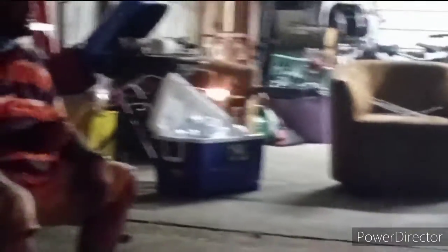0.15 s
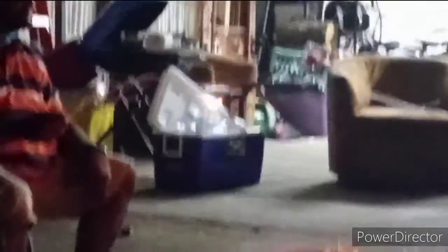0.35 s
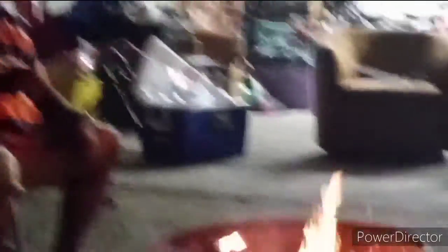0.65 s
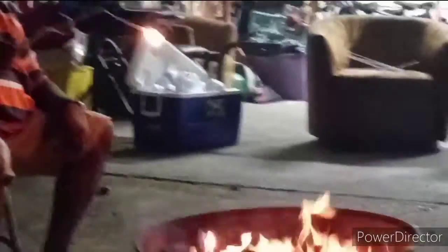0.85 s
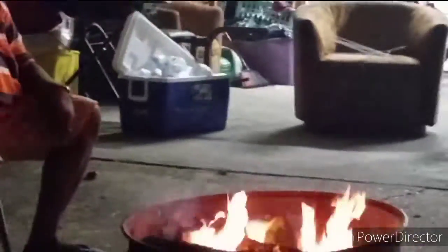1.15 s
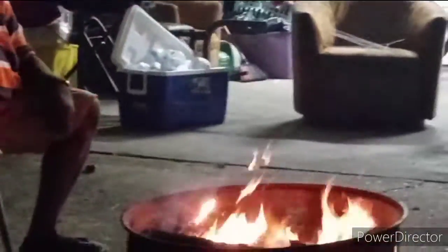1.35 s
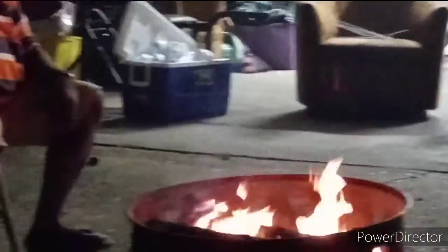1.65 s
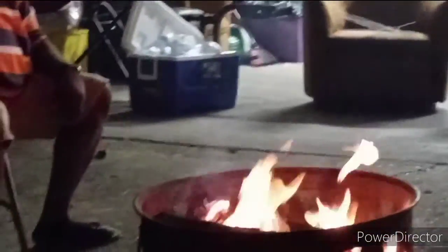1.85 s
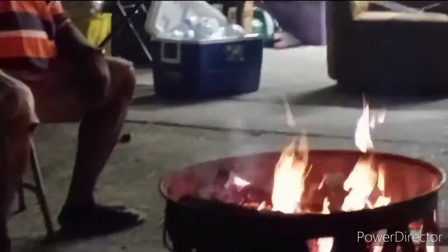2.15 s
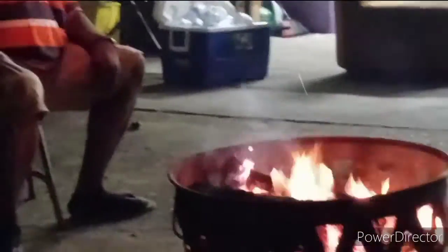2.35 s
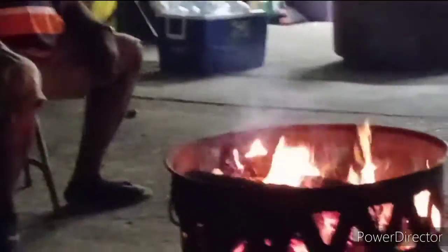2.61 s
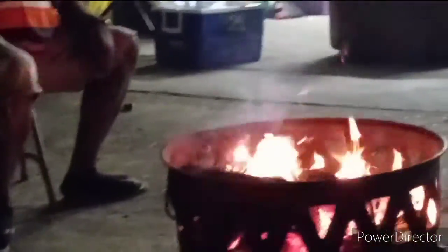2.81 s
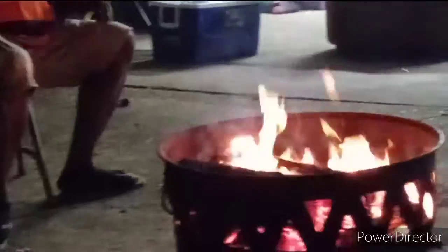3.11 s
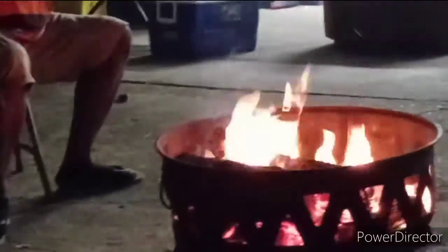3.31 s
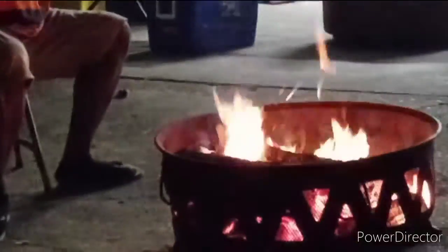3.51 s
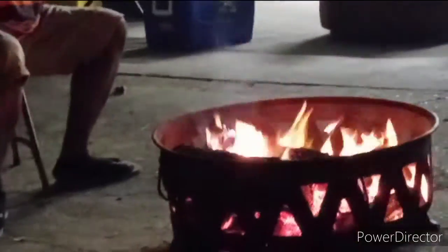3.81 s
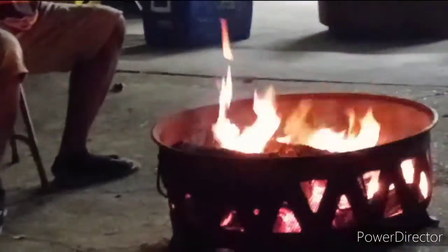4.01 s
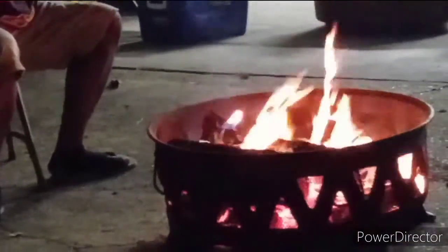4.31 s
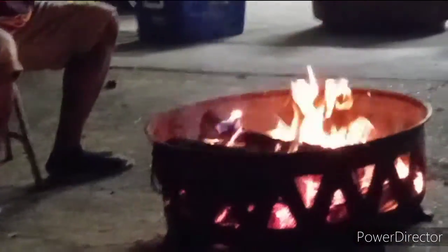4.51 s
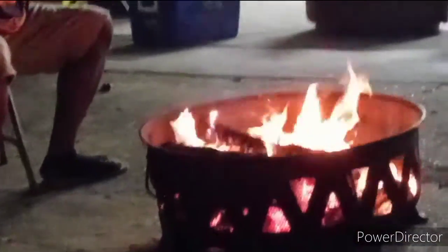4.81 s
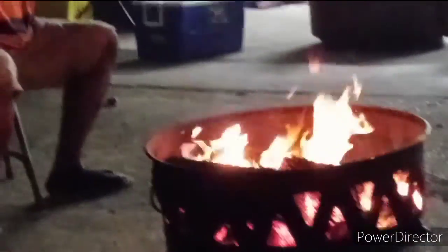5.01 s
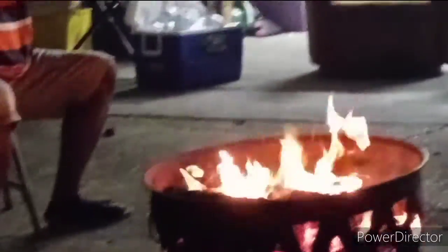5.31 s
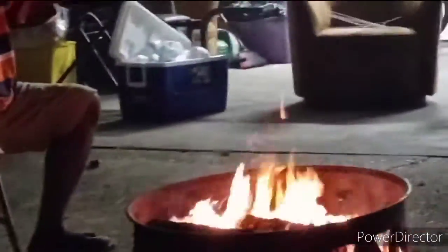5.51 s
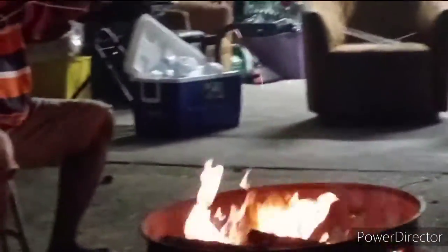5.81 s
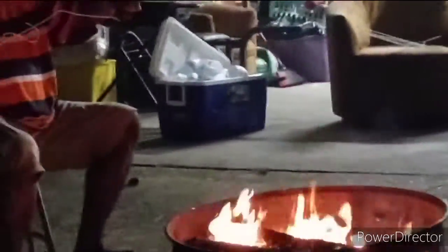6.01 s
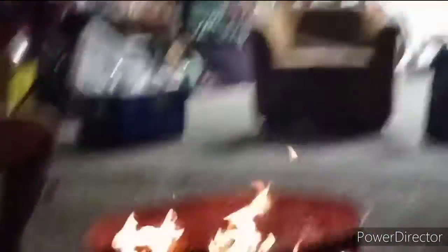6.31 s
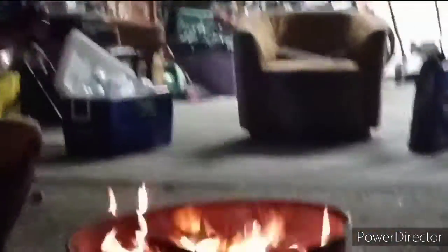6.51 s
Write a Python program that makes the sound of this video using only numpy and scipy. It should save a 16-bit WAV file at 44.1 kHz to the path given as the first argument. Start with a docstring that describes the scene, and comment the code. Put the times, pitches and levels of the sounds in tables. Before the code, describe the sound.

Night outdoors beside a small wood fire and open garage, heard in mono through one microphone. For about 6.7 seconds a dense cricket chorus holds: a bright trill near 7 kHz, pulsing chirps near 5.6 kHz, and fainter trills at 2.5 and 3 kHz. Closer chirps stand out at 0.15, 3.6 and 5.2. Far katydids make two-syllable rasps roughly every 0.8 seconds; a nearer one rasps in quick strokes at 2.2, 3.5, 4.5 and 6.4, with fluttering bush cricket buzzes around 2.2, 3.4, 4.5, 5.5 and 6.4. Dry fire pops snap at 0.24 and 0.55, then near 3, strongest with woody ring at 4.4, and again at 5.75, with tiny ticks between. Gritty scuffs come around 0.3, 1.15, 2.5, 4.8 and 5.9; soft knocks at 0.6, 2.0, 2.4 and 5.9. Faint fading rustle, traffic rumble and low engine drones lie beneath, the deepest from 5.8.

```python
"""First you hear a night full of crickets: crowds trilling at four pitches, and a few chirping closer. Katydids
rasp in short phrases and calls, and a high buzz of shaped noise comes in rhythmic bursts. A wood fire pops and
ticks: short bright noise with ringing wood. Filtered noise scuffs and knocks softly by an open garage. A faint
rustle, far insects and traffic, with wavering engine tones, lie underneath."""
import sys
import numpy as np
from scipy import signal
from scipy.fft import rfft, irfft, next_fast_len
from scipy.io import wavfile

SR = 44100
rng = np.random.default_rng(int(sys.argv[2]) if len(sys.argv) > 2 else 0)


def waveform_to_disk(signal):
    """Save audio, clipped to [-1, 1], as 16-bit WAV at the path in sys.argv[1]."""
    frames = np.transpose(np.atleast_2d(signal))
    scaled = np.clip(frames, -1, 1) * 32767
    samples = np.round(scaled).astype(np.int16)
    wavfile.write(sys.argv[1], SR, samples)


N = 293328
TIME = np.arange(N) / SR  # seconds

# two lower cricket crowds: (wing tone [Hz], spread between animals [Hz], mean stroke rate [1/s], level [dB])
TREE_CRICKETS = [(2459, 68, 48, -54), (2969, 70, 70, -58.5)]
# two higher crowds, same columns; the level is the average [dB] for the trill, the steady part for the chirpers
HIGH_CRICKETS = (6915, 150, 42.5, -43.3)
CHIRPERS = (5600, 165, 53, -50.5)
# drift of the high trill, used only as the difference from its mean: (time [s], level [dB])
HIGH_DRIFT = [(0, -45.5), (1.8, -46), (2.45, -44), (3.9, -45), (4.7, -44), (5.4, -45.5), (6.0, -49),
              (6.33, -46.5), (6.65, -46)]
# bouts of the chirping crowd: (start [s], length [s], level relative to its steady trill [dB])
BOUTS = [(0.053, 0.35, 4.5), (0.696, 0.28, 6), (1.326, 0.42, 3.5), (1.99, .31, 6.5), (2.597, 0.5, 6),
         (3.32, 0.7, 3.5), (4.42, .17, 2.5), (4.862, 0.18, 3.5), (5.17, 0.28, 6), (6.243, 0.16, 3)]
BOUT_ATTACK_S, BOUT_RELEASE_S = 0.086, 0.14
# chirps of nearer crickets: (start [s], wing strokes [count], wing tone [Hz], level before echo [dB])
CHIRPS = [(.15, 9, 5760, -45), (.68, 11, 5630, -49), (.78, 10, 5880, -50), (1.28, 10, 5570, -50),
          (1.98, 11, 5460, -51), (2.899, 12, 5840, -48.5), (3.604, 13, 5545, -42.5), (3.87, 11, 5380, -57),
          (5.161, 11, 5590, -42)]

# phrases of a near katydid:
# (middle of first stroke [s], strokes [count], stroke period [s], level [dB], change per stroke [dB])
PHRASES = [(2.199, 5, .0598, -39.3, 0.44), (3.49, 4, 0.06, -43, .7), (4.456, 6, .0628, -41.5, -1.45),
           (6.385, 5, 0.054, -47, 0.5)]
# tone colour of a katydid's toothed file: (frequency [Hz], relative level [dB])
RASP_COLOUR = [(3500, -21.5), (6000, -4), (7500, 3), (9500, 2.5), (10500, 1), (11500, -7), (15000, -10)]
STROKE_S, TOOTH_HZ = 0.019, 623  # half-width of a stroke; average teeth struck per second
# two-syllable calls of a far katydid: (start [s], level [dB])
FAR_CALLS = [(0.005, -49.5), (.785, -49.5), (1.535, -49), (2.03, -56.5), (2.26, -54), (3.26, -51.5),
             (4.06, -53), (4.915, -51), (5.745, -48.5), (6.515, -48)]
# tone colour of far katydids: (frequency [Hz], relative level [dB])
FAR_COLOUR = [(1750, -22.5), (2100, -3.5), (2350, 1), (3000, 3), (3500, 1), (4200, -7), (5000, 2),
              (8000, -17.5), (14000, -15)]
SYLLABLE_S, SYLLABLE_STEP_S, SYLLABLE_ATTACK_S, SYLLABLE_RELEASE_S = 0.027, 0.12, 0.035, 0.067
FAR_STEADY_DB = -64  # middle level of the rasp from still farther animals
# high buzzes: (start [s], length [s], level before flutter [dB])
BUZZES = [(2.18, 0.31, -52.5), (3.432, 0.25, -51), (4.467, 0.32, -51.5), (5.482, 0.36, -50.5),
          (6.424, 0.21, -50.5)]
# tone colour of the buzz: (frequency [Hz], relative level [dB])
BUZZ_COLOUR = [(5000, -31), (7500, 9.5), (8800, 8.5), (10500, 2), (12000, -2), (15000, -10)]
BUZZ_ATTACK_S, BUZZ_RELEASE_S, BUZZ_STEADY_DB = 0.087, 0.15, -66.5

# fire pops; both levels are before halving and fading:
# (start [s], crack level [dB], woody ring level [dB], lowest ring [Hz], time to fall 60 dB [s])
POPS = [(.08, -34, -50, 2600, 0.013), (0.239, -24, -31.5, 2600, 0.0058), (0.547, -24, -44, 2600, .007),
        (.620, -33, -40, 2000, .008), (2.948, -30, -48, 2600, 0.009), (3.13, -33, -50, 2600, 0.0077),
        (3.4233, -39, -31, 2730, 0.015), (3.797, -50, -40, 1950, .022), (4.3926, -19.5, -22.5, 1660, 0.01),
        (4.4106, -34, -33, 2330, 0.013), (4.754, -37, -31.5, 2300, .022), (5.739, -27, -48, 2600, .006),
        (5.9055, -38, -45, 2600, .006)]
# tone colour of the bright crack: (frequency [Hz], relative level [dB])
CRACK_COLOUR = [(2000, -76), (4500, 9), (7000, 3), (11000, 14.5), (15000, 7)]
# ringing tones of a splitting log: (multiple of the lowest ring [ratio], relative level [dB])
WOOD_RINGS = [(1, -4), (1.52, 3.5), (1.78, 8), (2.1, -10), (2.55, -13)]

# scuffs; levels are before the pressure, resonances and echo shape them:
# (peak [s], rub level [dB], dying time [s], lower resonance [Hz], upper resonance [Hz], dry hiss level [dB])
SCUFFS = [(.166, -52.5, 0.048, 900, 1950, -46), (.328, -48.5, 0.026, 865, 1150, -46.5),
          (.368, -49, 0.071, 830, 1600, -42.5), (1.135, -53, .022, 1190, 1720, -42),
          (1.168, -50, 0.061, 780, 1600, -64), (2.049, -58.5, .06, 1700, 1950, -70),
          (2.41, -56, .07, 810, 1250, -70), (2.51, -45, 0.039, 1510, 2080, -72),
          (2.557, -47, 0.056, 1150, 1420, -58), (2.835, -57.5, 0.063, 710, 1270, -75),
          (3.065, -51.5, 0.075, 840, 1830, -65), (4.775, -50.5, 0.042, 1600, 1950, -66),
          (4.86, -55, .08, 1930, 2080, -70), (5.15, -54, .11, 1710, 1980, -58),
          (5.29, -55.5, .04, 1660, 1900, -69), (5.77, -57, 0.093, 1510, 2070, -63),
          (5.872, -47.5, 0.026, 1490, 1950, -58), (5.908, -48.5, .028, 660, 1060, -65)]
# tone colour of the dry hiss: (frequency [Hz], relative level [dB])
SCUFF_HISS_COLOUR = [(2000, -8), (4000, 6), (9000, -0.5), (13000, 6), (15500, 1)]
# widths of the resonances: (lower [Hz], upper [Hz])
SCUFF_WIDTHS_HZ = 92, 190
SCUFF_RISE_SHARE = .42  # rise time as a share of the dying time
SCUFF_DIRECT_SHARE = 0.55  # of the rub, heard beside the resonances
GRIT_HZ, GRIT_DB = 260.5, 0.5  # how fast and how deeply a rub catches
# soft knocks; levels are before fading and echo: (start [s], dull thud [dB], woody clack [dB])
KNOCKS = [(0.621, -44.5, -52), (2.001, -44.5, -59), (2.385, -41, -41.5), (3.588, -59, -49),
          (3.802, -66, -58), (5.89, -42, -54.5)]
# tone colour of the dull thud: (frequency [Hz], relative level [dB])
THUD_COLOUR = [(100, -8), (250, 14), (480, -1.5), (800, -19), (2000, -43)]
# tone colour of the woody clack: (frequency [Hz], relative level [dB])
CLACK_COLOUR = [(400, -16), (800, -7.5), (1350, 1.5), (2000, -2), (3500, -1), (7000, -23)]

# starting level, fade per second, and greatest swing of each band either way
RUSTLE_DB, RUSTLE_FADE_DB_PER_S, RUSTLE_FLICKER_DB = -67.5, 0.92, 7.5
# tone colour of distant traffic: (frequency [Hz], relative level per Hz [dB])
TRAFFIC_COLOUR = [(20, -22), (35, -20), (55, -6.5), (85, 4), (130, 4), (200, -1.5), (300, -5.5), (400, -20),
                  (550, -34.5), (1050, -34), (1500, -27.5), (2000, -29.5), (3000, -21.5), (6000, -77)]
# tone colour of the haze of far insects: (frequency [Hz], relative level per Hz [dB])
HAZE_COLOUR = [(2000, -49), (3200, -31), (4100, -23), (4600, -10), (5100, -0.5), (6200, -1.5), (7400, 1),
               (8200, -19), (9100, -7), (10000, -19), (11000, -24), (15000, -20)]
TRAFFIC_DB, HAZE_DB = -50.5, -47  # middle levels; both waver
# drones of distant engines: (start [s], length [s], firing rate [Hz], climb [Hz], middle level [dB])
DRONES = [(0.187, 0.14, 180, 1.9, -52.5), (.65, 1.11, 120.1, 6.7, -49.5), (3.254, 0.46, 201, 13, -56.5),
          (4.3, 0.87, 117.4, 8.1, -50.5), (5.763, 0.99, 75.3, .7, -46)]
DRONE_ATTACK_S, DRONE_RELEASE_S = 0.067, 0.092
DRONE_WAVER_DB, DRONE_WAVER_SHARE = 2.0, .01  # of the level; of the firing rate
TOP_HZ = 15550  # where the recorder starts to cut the treble


def crickets():
    """Tree crickets hold steady, the high trill drifts in level, and the chirping crowd joins in by bouts."""
    low = sum(crowd(*row) for row in TREE_CRICKETS)
    drift_s, drift_db = np.transpose(HIGH_DRIFT)
    drift = np.interp(TIME, drift_s, drift_db)
    high = crowd(*HIGH_CRICKETS) * undb(drift - drift.mean())
    bouts = [undb(db) * swell(start, length, BOUT_ATTACK_S, BOUT_RELEASE_S)
             for start, length, db in BOUTS]
    chirping = crowd(*CHIRPERS) * together([1] + bouts)
    return low + high + chirping


def crowd(hz, spread_hz, rate, db, count=14):
    """Many crickets, each with its own pitch and tempo; their pitches stray, and distance blurs them."""
    out = np.zeros(N)
    for rank in (np.arange(count) + .5) / count:
        # most animals sit near the middle pitch, a few far off it
        place = .45 * np.log(rank / (1 - rank))
        own_hz = hz + spread_hz * (place + .6 * walk(25))
        first_stroke = rng.random()
        tempo = rate * (1 + .17 * rng.standard_normal() + .05 * walk(5))
        strokes = first_stroke + np.cumsum(tempo) / SR
        out += wing_tone(strokes, own_hz, sag=.04, duty=.6)
    return undb(db) * unit(yard(out, t60=0.46, wet_db=-9.0))


def wing_tone(strokes, hz, sag, duty):
    """A cricket's wing rings while it closes; the pitch sags through each stroke."""
    closing = np.minimum(strokes % 1 / duty, 1)  # 0 = open, 1 = closed
    phase = 2 * np.pi * np.cumsum(hz * (1 + sag * (.5 - closing))) / SR
    loudness = 4 * closing * (1 - closing)  # greatest when half closed
    return loudness * np.sin(phase)


def near_cricket(rate=53.1):
    """Runs of clean wing strokes, at `rate` strokes per second, from a few animals close by."""
    out = np.zeros(N)
    for start, count, hz, db in CHIRPS:
        strokes = TIME[:int(round(count) / rate * SR)] * rate
        chirp = unit(wing_tone(strokes, hz, sag=0.0334, duty=0.7))
        add(out, start, undb(db) * chirp)
    return yard(out, t60=0.38, wet_db=-26)


def katydids():
    """Each stroke drags a scraper over a file: a burst of tooth clicks, repeated evenly through a phrase."""
    near, t = np.zeros(N), TIME[:4096]
    middle = t.mean()
    press = np.exp(-((t - middle) / STROKE_S) ** 2)
    for first, count, period, db, change_db in PHRASES:
        for k in range(int(round(count))):
            tooth_phase = np.cumsum(TOOTH_HZ * (1 + .2 * walk(150)[:len(t)])) / SR
            teeth = np.exp(-(tooth_phase % 1) / 1.2)  # each tooth starts sharply and fades
            rasp = unit(teeth * noise(RASP_COLOUR, size=len(t)))
            add(near, first + k * period - middle, undb(db + k * change_db) * press * rasp)
    return yard(near, t60=.35, wet_db=-10)


def far_katydids():
    """Distance blurs the teeth into a rasp: two syllables to a call, at uneven intervals."""
    syllables = []
    for start, db in FAR_CALLS:
        for k in range(2):
            shape = swell(start + k * SYLLABLE_STEP_S, SYLLABLE_S, SYLLABLE_ATTACK_S, SYLLABLE_RELEASE_S)
            syllables.append(undb(db) * shape)
    steady = undb(FAR_STEADY_DB + 3.3 * walk(13))
    return noise(FAR_COLOUR) * together([steady] + syllables)


def high_buzz():
    """A fluttering high buzz of noise that swells about once a second, after a faint steady start."""
    buzzes = [undb(db) * swell(start, length, BUZZ_ATTACK_S, BUZZ_RELEASE_S)
              for start, length, db in BUZZES]
    flutter = undb(1.7 * walk(70))
    return noise(BUZZ_COLOUR) * together([undb(BUZZ_STEADY_DB)] + buzzes) * flutter


def fire(count=36):
    """Gas pockets burst in the logs: a bright crack that rings the wood; tiny ticks fall between."""
    out, t = np.zeros(N), TIME[:2048]
    # ticks have the columns of POPS, with chance times, sizes and pitches
    ticks = [(when * N / SR, -51 + 9 * size, -58 + 9 * size, 1500 + 1500 * pitch, .005)
             for when, size, pitch in rng.random((count, 3))]
    for start, crack_db, ring_db, hz, t60 in POPS + ticks:
        crack = noise(CRACK_COLOUR, size=len(t))
        ring = unit(sum(undb(db) * np.sin(2 * np.pi * hz * multiple * t) for multiple, db in WOOD_RINGS))
        burst = .5 * (undb(crack_db) * crack + undb(ring_db) * ring)
        add(out, start, burst * np.exp(-np.log(1000) * t / t60))
    # a splinter is too small to radiate bass
    no_bass = signal.butter(4, 1350, "highpass", fs=SR, output="sos")
    return yard(signal.sosfilt(no_bass, out), t60=.15, wet_db=-11)


def scuffs():
    """Gritty rubs swell and die away through two resonances, with a few knocks, ringing in the garage."""
    out, t = np.zeros(N), TIME[:SR // 2]
    for peak, db, fall, low_hz, high_hz, hiss_db in SCUFFS:
        rise = SCUFF_RISE_SHARE * fall
        since = t - 2 * rise  # seconds after the peak
        press = np.where(since < 0, np.exp(-(since / rise) ** 2), np.exp(-np.abs(since) / fall))
        grit = unit(undb(GRIT_DB * walk(GRIT_HZ)[:len(t)]))
        rub_colour = [(low_hz / 3, -11), (low_hz, 0), (high_hz, 0), (high_hz * 2, -9), (high_hz * 5, -30)]
        rub = grit * press * noise(rub_colour, size=len(t))
        rings = sum(resonance(rub, hz, width) for hz, width in zip((low_hz, high_hz), SCUFF_WIDTHS_HZ))
        hiss = grit * press ** 2 * noise(SCUFF_HISS_COLOUR, size=len(t))
        scuff = undb(db) * (SCUFF_DIRECT_SHARE * rub + rings) + undb(hiss_db) * hiss
        add(out, peak - 2 * rise, scuff)
    for start, thud_db, clack_db in KNOCKS:
        thud = undb(thud_db) * noise(THUD_COLOUR, size=len(t))
        clack = undb(clack_db) * noise(CLACK_COLOUR, size=len(t))
        add(out, start, (thud + clack) * np.exp(-t / 0.014))
    return yard(out, t60=0.6, wet_db=-10.5)


def rustle():
    """A faint, uneven rustle that slowly fades: neighbouring bands of noise flicker on their own."""
    out = np.zeros(N)
    for hz in np.geomspace(650, 1900, num=12):
        band = rng.standard_normal(N)
        for _ in range(2):  # filtering twice makes the band's edges steeper
            band = resonance(band, hz, width_hz=170)
        out += band * undb(RUSTLE_FLICKER_DB * np.tanh(walk(14)))
    return unit(out) * undb(RUSTLE_DB - RUSTLE_FADE_DB_PER_S * TIME)


def background():
    """Road rumble and a haze of far insects; each engine swells, climbs as it picks up speed, and fades."""
    rumble = noise(TRAFFIC_COLOUR) * undb(TRAFFIC_DB + 1.78 * walk(7))
    haze = noise(HAZE_COLOUR) * undb(HAZE_DB + 2.06 * walk(7))
    out = rumble + haze
    for start, length, hz, climb_hz, db in DRONES:
        firing = hz + climb_hz * np.clip((TIME - start) / length, 0, 1) ** 2
        phase = 2 * np.pi * np.cumsum(firing * (1 + DRONE_WAVER_SHARE * walk(14))) / SR
        level = undb(db + DRONE_WAVER_DB * walk(12)) * swell(start, length, DRONE_ATTACK_S, DRONE_RELEASE_S)
        out += np.sqrt(2) * np.sin(phase) * level  # root 2 gives the sine an rms of 1
    return out


def yard(x, t60, wet_db):
    """Trees and walls scatter the sound into a short tail, which falls 60 dB in t60 seconds."""
    t = TIME[:SR // 2]
    tail = rng.standard_normal(len(t)) * np.exp(-np.log(1000) * t / t60)
    echo = signal.fftconvolve(x, tail / np.linalg.norm(tail))[:N]
    return x + undb(wet_db) * echo


def resonance(x, hz, width_hz):
    """One ringing band, gain 1 at its centre."""
    return signal.lfilter(*signal.iirpeak(hz, hz / width_hz, fs=SR), x)


def swell(start, length, attack, release):
    """Rises to 1 at the start, holds, then dies away."""
    before = np.maximum(start - TIME, 0)
    after = np.maximum(TIME - start - length, 0)
    return np.exp(-before / attack - after / release)


def together(gains):
    """Unrelated voices add in power."""
    return np.sqrt(sum(gain ** 2 for gain in gains))


def walk(rate):
    """Slow chance with a spread near 1: `rate` random values a second, joined by straight lines."""
    knots = rng.standard_normal(int(N / SR * rate) + 2)
    return np.interp(TIME * rate, np.arange(len(knots)), knots)


def noise(points, size=N):
    """Coloured noise of rms 1."""
    return unit(colour(rng.standard_normal(size), points))


def colour(x, points):
    """Filter by a (frequency [Hz], level [dB]) table."""
    hz, db = np.transpose(points)
    size = next_fast_len(len(x))
    f = np.maximum(np.fft.rfftfreq(size, 1 / SR), 1)
    gain = undb(np.interp(np.log(f), np.log(hz), db))
    return irfft(rfft(x, size) * gain, size)[:len(x)]


def undb(db):
    """Decibels to gain."""
    return 10 ** (np.asarray(db) / 20)


def unit(x):
    """Scale to rms 1."""
    return x / np.sqrt(np.mean(x ** 2) + 1e-30)


def add(out, start, sound):
    """Mix a sound in at a start time in seconds."""
    i = max(int(start * SR), 0)
    out[i:i + len(sound)] += sound[:max(N - i, 0)]


def scene():
    """One microphone feeds both channels."""
    insects = crickets() + near_cricket() + katydids() + far_katydids() + high_buzz()
    mono = insects + fire() + scuffs() + rustle() + background()
    return np.array([mono, mono])


def record(dry):
    """The recorder cuts the top steeply."""
    return signal.sosfilt(signal.ellip(10, .2, 70, TOP_HZ, fs=SR, output="sos"), dry)


dry = scene()
out = record(dry)
waveform_to_disk(out)
```